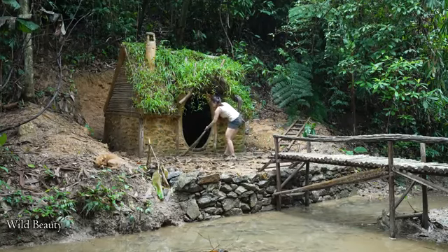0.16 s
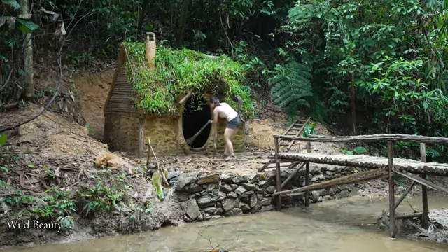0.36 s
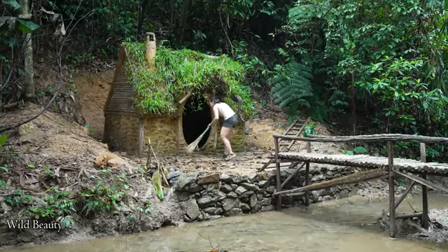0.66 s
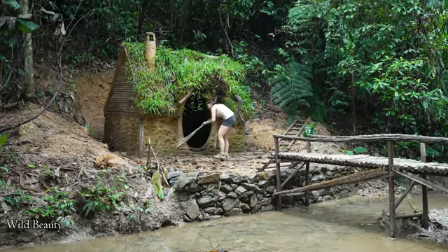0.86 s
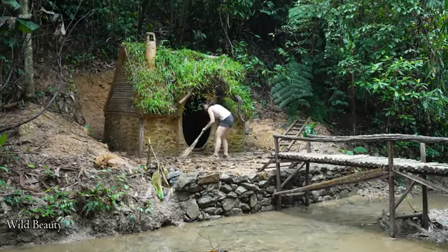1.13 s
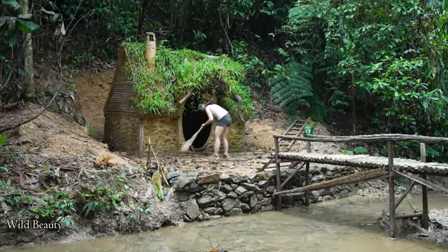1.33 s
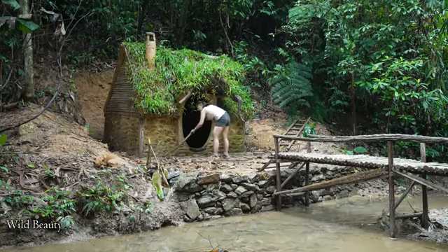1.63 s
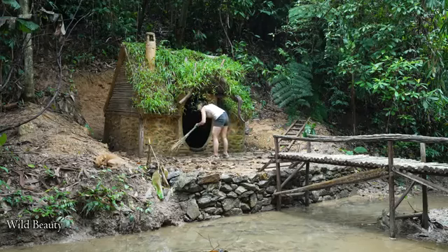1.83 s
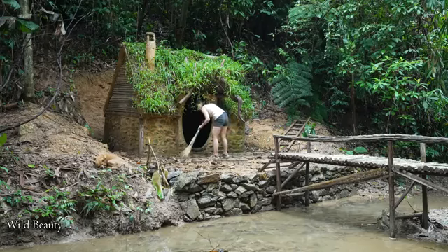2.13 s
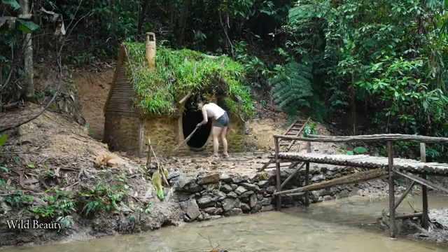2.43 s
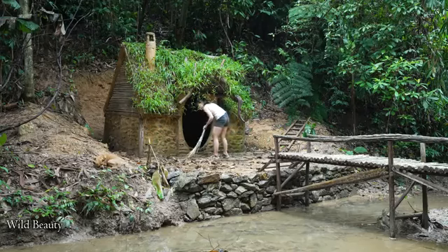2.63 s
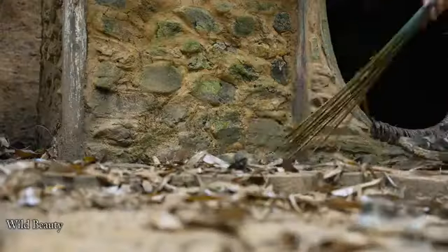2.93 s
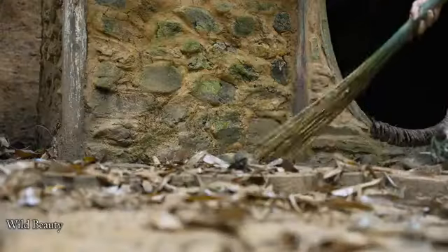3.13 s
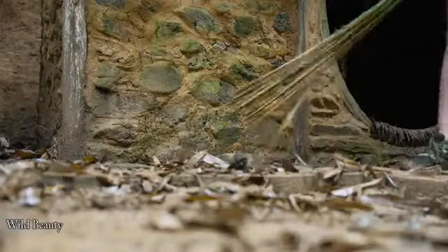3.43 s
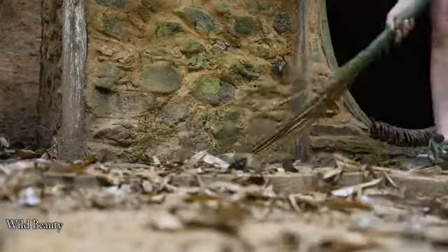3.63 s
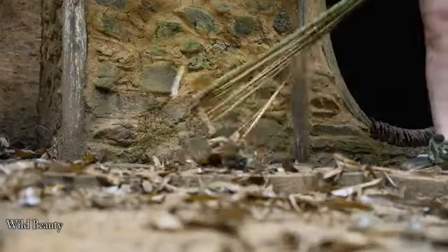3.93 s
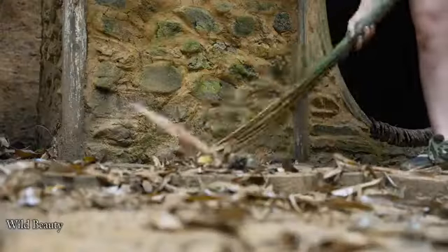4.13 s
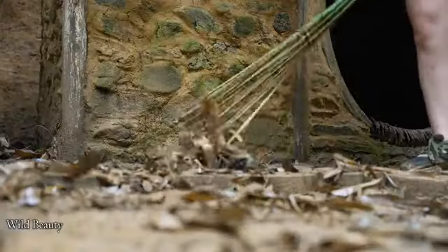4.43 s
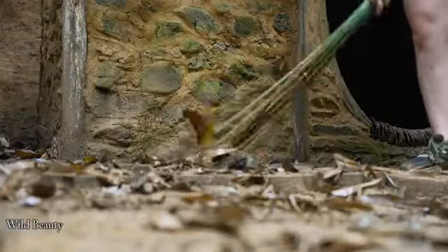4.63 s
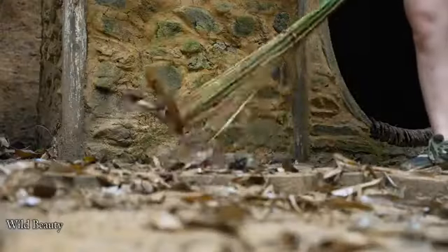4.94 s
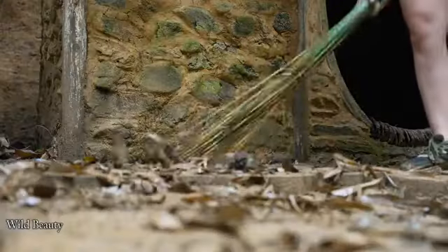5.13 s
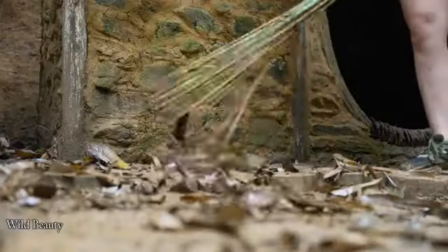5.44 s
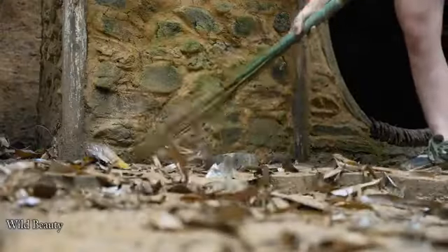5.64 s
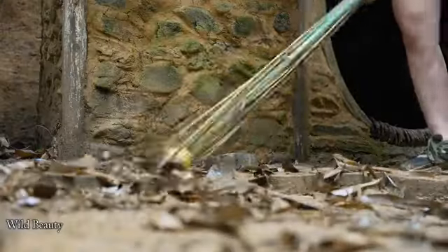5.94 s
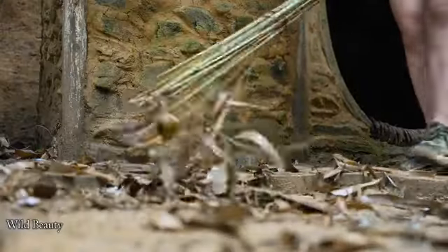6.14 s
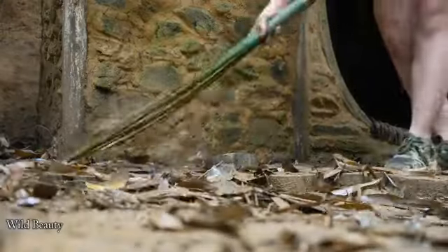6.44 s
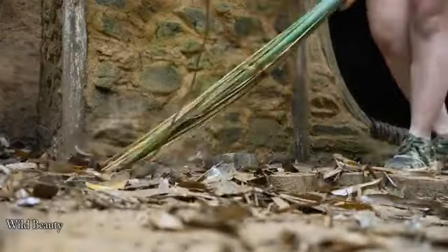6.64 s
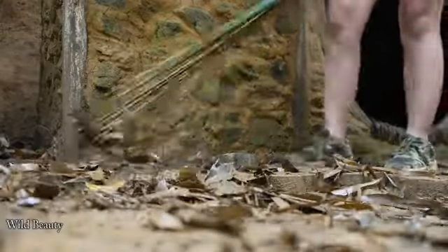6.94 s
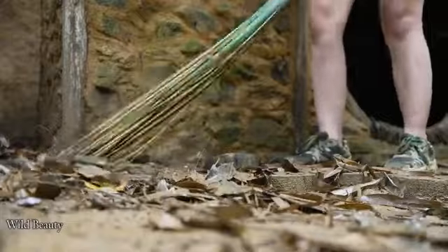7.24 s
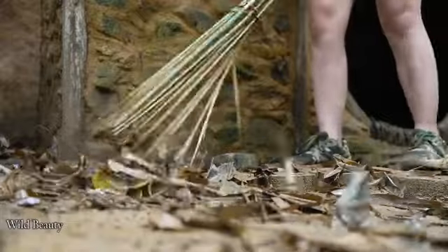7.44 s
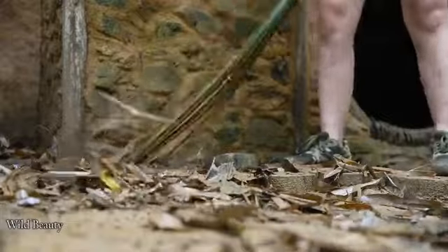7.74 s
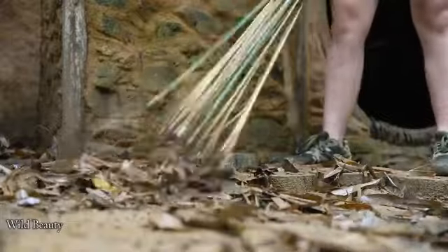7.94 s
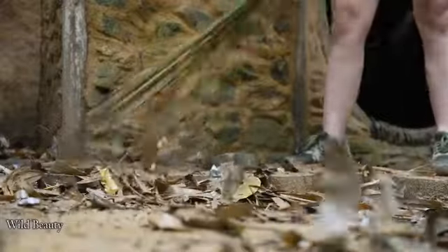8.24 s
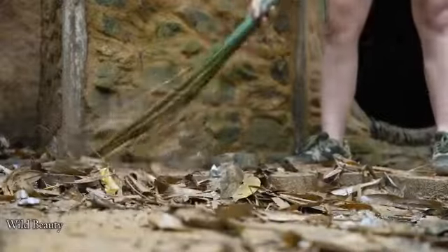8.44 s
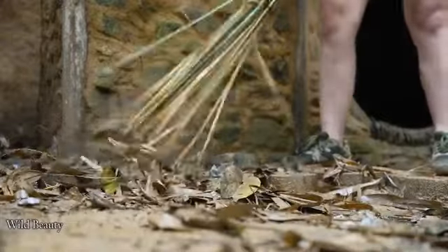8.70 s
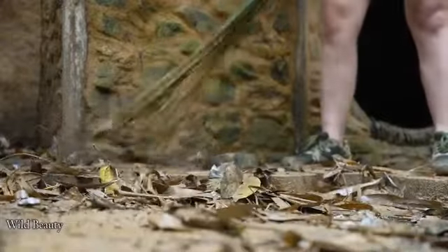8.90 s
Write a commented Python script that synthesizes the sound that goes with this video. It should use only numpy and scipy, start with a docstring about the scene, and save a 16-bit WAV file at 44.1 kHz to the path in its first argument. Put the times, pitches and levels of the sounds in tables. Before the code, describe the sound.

A bamboo broom sweeps dry leaves on packed earth in a forest, about two strokes a second. For three seconds it is farther from the microphone, with a high cricket chirping regularly, a fainter one buzzing, and thin insect hiss. Then the microphone is close: fuller rustling strokes, sharp crackles, hollow handle knocks and low earth thumps, with insects much fainter.

```python
"""First comes the hiss of far insects over a low forest murmur, with a short scuff of broom tines.
A split-bamboo broom then sweeps dry leaves over packed earth, far from the microphone and, after 3 s, close to it.
Noise gated by clumps of crackles makes the leaves; resonances make the hollow handle and the earth.
In the distant part a cricket chirps in tone pulses, and a fainter one answers in buzzes of narrow noise."""
import sys
import numpy as np
from scipy import signal
from scipy.fft import next_fast_len
from scipy.io import wavfile
from scipy.ndimage import uniform_filter1d

SR = 44100
rng = np.random.default_rng(int(sys.argv[2]) if len(sys.argv) > 2 else 0)


def generate_wav(sig):
    """Save sig (samples, or channels by samples) to the path in sys.argv[1] as 16-bit PCM at SR."""
    pcm = np.round(np.clip(np.atleast_2d(sig).T, -1, 1) * 32767).astype(np.int16)
    wavfile.write(sys.argv[1], SR, pcm)


N = 399987
CLOSE_S = 3.01  # from here on the microphone stands close to the broom


def gain_of(db):
    """Amplitude factor of a level in dB."""
    return 10 ** (np.asarray(db) / 20)


def evened(x):
    """Scales a signal to rms 1."""
    return x / np.sqrt(np.mean(x ** 2) + 1e-20)


def smoothed_twice(x, span):
    """Two moving averages over span samples leave a slow drift."""
    return uniform_filter1d(uniform_filter1d(x, span, axis=0), span, axis=0)


def coloured(x, points):
    """Causal filter whose gain follows a (Hz, dB) spectrum; white noise keeps its power."""
    hz = abs(np.fft.fftfreq(8192, 1 / SR))
    f, db = np.transpose(points)
    log_gain = np.interp(np.log(hz + 1), np.log(f), db) * np.log(10) / 20
    # minimum phase: the phase is the Hilbert transform of the log gain
    taps = np.fft.ifft(np.exp(np.conj(signal.hilbert(log_gain)))).real
    if abs(taps[:64]).sum() <= abs(taps[-64:]).sum():
        taps = np.roll(taps[::-1], 1)  # turned so that the response starts at once
    return signal.oaconvolve(x, taps[:2048] / np.linalg.norm(taps))[:N]


def resonate(x, hz, width):
    """One fixed resonance of gain 1."""
    r = np.exp(-np.pi * width / SR)
    return 2 * signal.lfilter([1 - r], [1, -r * np.exp(2j * np.pi * hz / SR)], x).real


def dying(power, decay_s):
    """Lets each burst of power die away exponentially."""
    return signal.lfilter([1], [1, -np.exp(-1 / (decay_s * SR))], power)


def bursts(per_s, spread_db, decay_s):
    """Power of leaves snapping at random moments, most small and a few large; mean 1."""
    chance = rng.random(N)
    size = np.minimum(rng.exponential(1, N), 3)
    power = dying((chance < per_s / SR) * gain_of(2 * spread_db * size), decay_s) / per_s
    return power / power.mean()


def event_power(events, db, decay_s):
    """Power of single events, each rising quickly and dying away."""
    power = np.zeros(N)
    power[np.round(np.transpose(events)[0] * SR).astype(int)] = gain_of(2 * db)
    return 2 * (dying(power, decay_s) - dying(power, .3 * decay_s))


# low forest air, spectrum: (f/Hz, relative level per Hz/dB)
LOW_AIR = [(20, -25), (60, -18.5), (200, -9), (600, -9), (2000, -38.5)]
# treble of forest air and crisp leaves, spectrum: (f/Hz, relative level per Hz/dB)
TREBLE = [(3500, -19.5), (5200, -2.5), (8000, -3.5), (11000, -9.5), (15000, -10.5)]
LOW_AIR_DB, HISS_DB = -48.5, -52


def breeze():
    """Steady low murmur and faint treble hiss of the forest, both coloured noise."""
    low, high = rng.standard_normal((N, 2)).T
    return gain_of(LOW_AIR_DB) * coloured(low, LOW_AIR) + gain_of(HISS_DB) * coloured(high, TREBLE)


# hiss bands of distant insects: (f/Hz, width/Hz, level before the wavering/dB)
INSECT_BANDS = [(4190, 830, -40), (4900, 840, -52.5), (6540, 590, -44)]
INSECTS_CLOSE_DB = -12  # change of their level once the microphone is close to the broom


def chorus():
    """Narrow wavering hiss of many far insects, fainter close to the broom."""
    noise, waver = rng.standard_normal((N, 2)).T
    waver = evened(smoothed_twice(waver, 3000))
    bands = sum(gain_of(db) * evened(resonate(resonate(noise, hz, width), hz, width))
                for hz, width, db in INSECT_BANDS)
    close = np.arange(N) > CLOSE_S * SR
    return bands * gain_of(0.79 * waver + INSECTS_CLOSE_DB * close)


LAND_S = 0.014  # time the tines take to land


def contact(start, land_db, push_s, top_db, fade_db_per_s):
    """Power of one touch of the broom: quick landing, swell, then a steady fade in dB."""
    u = np.arange(N) / SR - start
    swell_db = (top_db - land_db) * np.clip(u / push_s, 0, 1)
    db = land_db + swell_db - fade_db_per_s * np.maximum(u - push_s, 0)
    return np.clip(u / LAND_S, 0, 1) ** 2 * gain_of(2 * db)


# strokes: the tines land, the drag swells through the push, then dies as the broom lifts and the leaves settle
# (landing t/s, landing drag level/dB, push t/s, drag level at end of push/dB, fade/dB per s,
#  base treble level over drag/dB)
SWEEPS = [(0.117, -22, 0.04, -19.5, 31, -12), (0.625, -13.5, 0.07, -15, 98, -7.5),
          (1.112, -19.5, 0.2, -13, 148, -7.5), (1.645, -18, 0.057, -16, 203, -9.5),
          (2.07, -26, 0.13, -14, 144, -11.5), (2.595, -16, 0.18, -12.5, 95, -6.5),
          (3.095, -15.5, 0.28, -15, 122, -9.5), (3.635, -14, 0.27, -15.5, 134, -10),
          (4.148, -15, 0.22, -13.5, 83, -7), (4.645, -17, 0.18, -11.5, 95.5, -11),
          (5.115, -14.5, .2, -13, 88, -6.5), (5.695, -26, 0.19, -12, 48, -8),
          (6.508, -11, 0.22, -12.5, 71, -11.5), (7.095, -25, 0.18, -8, 52.5, -9),
          (7.76, -13.5, 0.17, -11.5, 59, -11.5), (8.435, -16, 0.22, -9, 85, -7),
          (9.04, -9.5, 0.041, -19, 96, -13)]
# short scuffs as tines catch again within or between strokes: (start t/s, length t/s, drag level/dB)
CATCHES = [(0, 0.023, -27), (0.453, 0.087, -24.5), (0.764, 0.083, -18.5), (1.75, 0.2, -17),
           (2.258, 0.12, -18), (2.828, 0.14, -15.5), (3.027, 0.0098, -17), (3.441, 0.018, -16.5),
           (3.511, 0.095, -22.5), (4.483, 0.045, -25), (5.014, .03, -34), (5.746, 0.34, -16),
           (6.394, 0.02, -20.5), (6.443, 0.031, -17.5), (6.86, 0.06, -24), (7.121, 0.029, -14.5),
           (7.556, 0.016, -21), (7.986, 0.11, -21.5), (8.831, 0.089, -17.5), (8.951, 0.017, -21)]
SCUFF_FADE_DB_PER_S, REST_DB = 323, -35.5  # end of a scuff; leaves stirring between strokes


def drag():
    """Drag on the leaves in dB, summed as power over all strokes and scuffs."""
    power = sum(contact(*row[:-1]) for row in SWEEPS)
    power = power + sum(contact(s, db, length, db, SCUFF_FADE_DB_PER_S) for s, length, db in CATCHES)
    return 10 * np.log10(power + gain_of(2 * REST_DB))


# spectrum of rustling leaves: (f/Hz, relative level per Hz/dB)
RUSTLE_COLOUR = [(40, -59.5), (120, -15.5), (300, -5.5), (850, -6.5), (1450, -2), (2300, -0.5), (3700, 0.5),
                 (5000, -11.5), (6500, -44.5)]
# overtones of handle and tines: (f/Hz, width/Hz, level/dB relative to the rustle)
RINGS = [(1097, 70.4, 10.5), (1784, 86, -2), (2196, 71, -0.5), (3320, 440, -11.5)]
# loudest single crackles: (t/s, relative peak level/dB, relative treble level/dB)
LOUD_CRACKLES = [(0.1275, -17, -39), (.2495, -11.5, -29), (.302, -14, -30.5), (0.637, -5.5, -22),
                 (.684, -6.5, -21), (0.773, -6.5, -21), (0.841, -9.5, -41), (1.028, -20, -43),
                 (1.1233, -12.5, -42), (1.1805, -2.5, -25), (1.288, -7, -30), (1.322, -4, -29),
                 (1.516, -8.5, -37), (2.171, -2.5, -31), (2.183, -7, -23), (2.278, -5, -27),
                 (2.3575, -4.5, -41), (2.605, -6, -41), (2.671, -6, -28), (2.834, -1, -22), (3.11, -5, -38),
                 (3.1362, -2, -29), (3.235, -1, -27), (3.3295, -1.5, -17.5), (3.4503, -4.5, -30.5),
                 (3.497, -7.5, -36), (3.5272, -4, -41), (3.648, 0, -28), (3.704, -3, -19), (3.724, -4, -23),
                 (3.7673, -2, -19), (3.8652, -5, -23), (3.994, -14, -34), (4.1586, -2, -22),
                 (4.339, -2, -23), (4.4195, -5, -32), (4.487, -9, -37), (4.653, -4, -33),
                 (4.706, -3.5, -32), (4.836, -3, -18.5), (5.035, -14.5, -48), (5.129, -3, -24),
                 (5.207, -5, -28), (5.3844, -7, -37), (5.7568, -3, -30), (6.0108, -10, -28),
                 (6.357, -11.5, -55), (6.5165, 0, -46), (6.8265, 0, -32), (6.921, -9, -22),
                 (6.96, -10.5, -47), (7.1383, -0.5, -27), (7.216, 2, -25.5), (7.281, 1.5, -28),
                 (7.331, -11, -31), (7.436, 0.5, -20.5), (7.4734, -0.5, -26.5), (7.5669, -5.5, -40),
                 (7.767, -3, -45), (7.8303, -13, -36), (7.851, -6, -32), (8.035, -2, -26),
                 (8.0675, -7, -38), (8.086, -5.5, -38), (8.2789, -9.5, -30.5), (8.4472, -2, -23.5),
                 (8.4991, -5, -43), (8.7586, -9, -30), (8.8137, -4, -39), (8.874, -1.5, -21.5)]
RING_PATCHY_DB = 4  # rms


def rustle(drag_db, clumps, ticks, scratches, grip):
    """Leaves crushed in clumps: gated noise that also excites the overtones of handle and tines."""
    _, peak_db, _ = np.transpose(LOUD_CRACKLES)
    power = gain_of(2 * drag_db) * (0.16 + .3 * clumps + 0.045 * ticks + 0.16 * scratches)
    power = power + event_power(LOUD_CRACKLES, peak_db - 8.5, decay_s=0.0046)
    leaves = coloured(rng.standard_normal(N) * np.sqrt(power), RUSTLE_COLOUR)
    rung = leaves
    # the overtones ring unevenly as the grip and the tines shift
    for (hz, width, db), shift in zip(RINGS, grip.T):
        uneven = leaves * gain_of(RING_PATCHY_DB * evened(shift))
        rung = rung + gain_of(db) * resonate(uneven, hz, width)
    close = np.arange(N) / SR > CLOSE_S
    return rung + close * gain_of(-5) * resonate(rung, 694, 350)  # more body close by


def tines(per_s, spread_db, cycles, count):
    """Small pitched snaps: each flick rings one tine or twig for tens of cycles; rms 1."""
    size = gain_of(spread_db * np.minimum(rng.exponential(1, N), 4)) * (rng.random(N) < per_s / SR)
    which = rng.integers(0, count, N)
    pitches = np.geomspace(1750, 4200, count)
    return evened(sum(resonate(size * (which == k), hz, hz / cycles) * cycles / hz
                      for k, hz in enumerate(pitches)))


def crisp_treble(drag_db, clumps, ticks, sparks):
    """Crisp leaf treble: noise gated more spikily than the rustle, so that short ticks stand out."""
    t = np.arange(N) / SR
    base_db = np.interp(t, *np.transpose(SWEEPS)[[0, -1]])
    crisp_db = base_db - 0.098 * (drag_db + 48.0)  # light strokes are crisper
    _, _, treble_db = np.transpose(LOUD_CRACKLES)
    power = gain_of(2 * (drag_db + crisp_db)) * (0.14 + 0.17 * clumps + 0.14 * ticks + 0.016 * sparks)
    power = power + event_power(LOUD_CRACKLES, treble_db + 1.5, decay_s=0.0032)
    # the dry crack that starts each one
    power = power + event_power(LOUD_CRACKLES, treble_db + 13, decay_s=0.0002)
    return coloured(rng.standard_normal(N) * np.sqrt(power), TREBLE)


# jolts of the handle as the broom lands or knocks during a stroke, heard close by: (t/s, peak level/dB)
HANDLE_JOLTS = [(3.035, -17), (3.083, -8.5), (3.14, -8.5), (3.209, -11), (3.648, -11.5), (4.157, -8.5),
                (4.244, -11.5), (4.653, -10.5), (5.129, -12.5), (5.796, -7.5), (6.456, -10.5),
                (6.588, -15), (7.13, -10.5), (7.696, -25), (7.767, -4), (8.436, -14.5), (8.481, -12.5),
                (9.047, -10)]
HANDLE_HZ, HANDLE_WIDTH_HZ = 356, 70  # lowest air mode of the hollow handle
HANDLE_WAVER_HZ = 12  # rms


def jolts():
    """Each jolt swells for a few cycles and dies, its pitch a little different with every grip."""
    out, t = np.zeros(N), np.arange(6000) / SR
    u = t / 0.011  # time in units of the swell
    for (s, db), (pitch, phase) in zip(HANDLE_JOLTS, rng.uniform(-1.15, 1, (len(HANDLE_JOLTS), 2))):
        hz = HANDLE_HZ * (1 + .04 * pitch)
        ring = gain_of(db) * u * np.exp(1 - u) * np.sin(2 * np.pi * hz * t + np.pi * phase)
        part = out[round(s * SR):][:len(t)]
        part += ring[:len(part)]
    return out


def handle_hum(drag_db, shake, grip_drift):
    """The hollow handle resonates with the drag, faintly from afar, and rings on after each jolt."""
    noise = rng.standard_normal(N) * shake
    hum = resonate(resonate(noise, HANDLE_HZ, HANDLE_WIDTH_HZ), HANDLE_HZ, 88)
    # the grip bends the pitch
    waver = np.exp(2j * np.pi * np.cumsum(HANDLE_WAVER_HZ * evened(grip_drift)) / SR)
    return (signal.hilbert(hum, next_fast_len(N))[:N] * waver).real + jolts()


def ground(shake):
    """The earth drums under the tines as a low resonance, and each jolt of the handle thumps."""
    thumps = event_power(HANDLE_JOLTS, np.transpose(HANDLE_JOLTS)[1] + 25.6, decay_s=0.012)
    noise = rng.standard_normal(N) * np.sqrt(shake ** 2 + thumps)
    return gain_of(-23.0) * resonate(noise, 183, 68)


def snaps(db, decay_s, width_hz):
    """The pitched core of each loud crackle: a burst of noise in a broad resonance."""
    out, fade = np.zeros(N), np.exp(-np.arange(2000) / (decay_s * SR))
    noise = rng.standard_normal((len(LOUD_CRACKLES), len(fade)))
    pitches = 1000 * 3.7 ** rng.random(len(LOUD_CRACKLES))
    for (s, peak_db, _), hz, burst in zip(LOUD_CRACKLES, pitches, noise):
        part = out[round(s * SR):][:len(fade)]
        part += (gain_of(peak_db + db) * resonate(burst * fade, hz, width_hz))[:len(part)]
    return out


def broom():
    """The same drag and crackles drive rustle, tines, crisp treble, handle and earth."""
    drag_db = drag()
    busy = gain_of(.6 * (drag_db + 19.0))  # a heavy stroke crushes more leaves a second
    clumps = bursts(per_s=110 * busy, spread_db=3.8, decay_s=0.0065)
    ticks = bursts(per_s=60 * busy, spread_db=5.5, decay_s=0.004)
    sparks = bursts(per_s=40, spread_db=5.5, decay_s=.0004)
    scratches = bursts(per_s=150 * busy, spread_db=4.5, decay_s=.0012)  # single twig tips catching
    grip = smoothed_twice(rng.standard_normal((N, len(RINGS))), round(0.038 * SR))
    leaves = gain_of(-5.5) * rustle(drag_db, clumps, ticks, scratches, grip)
    flick_gain = gain_of(drag_db - 7.0) * np.sqrt(0.084 + 0.67 * ticks)
    flicks = flick_gain * tines(per_s=1200, spread_db=3.0, cycles=70.0, count=16)
    crisp = crisp_treble(drag_db, clumps, ticks, sparks)
    far = np.arange(N) / SR < CLOSE_S
    steady_db = np.where(far, drag_db - 31.0, 0.78 * drag_db - 14.5)
    shake = gain_of(steady_db + 27.0) * np.sqrt(.5 + .5 * clumps)
    hum = handle_hum(drag_db, shake, grip[:, -1])
    return leaves + flicks + crisp + hum + ground(shake) + snaps(db=6.0, decay_s=0.005, width_hz=230)


# cricket chirps heard from the distant place: middle of the last pulse, t/s
CHIRP_ENDS = [.194, .451, .725, .997, 1.259, 1.533, 1.79, 2.053, 2.318, 2.578, 2.845]
CRICKET_HZ, CRICKET_DB = 7755, -30.5  # mean pitch and peak level of the full-strength pulses
PULSE_S = .0148  # spacing of the pulses


def cricket():
    """Each chirp is a row of nine tone pulses that swell and climb slightly in pitch."""
    out, half = np.zeros(N), round(0.0079 * SR)
    t, shape = np.arange(2 * half) / SR, np.hanning(2 * half)
    for end in CHIRP_ENDS:
        for k in range(9):  # counted back from the last pulse
            early = max(k - 4, 0)  # the last five pulses are at full strength
            at = round((end - k * PULSE_S) * SR) - half
            hz = CRICKET_HZ - 30 * early + 35 * rng.standard_normal()
            db = CRICKET_DB - 1.8 * early + 1.3 * rng.standard_normal()
            tone = np.sin(2 * np.pi * (hz * t + rng.random()))
            out[at:at + 2 * half] += gain_of(db) * shape * tone
    return out


# dull thuds of foot or broom on the earth: (t/s, relative level/dB)
THUDS = [(0.126, -10.5), (7.05, -6.5), (7.695, -15)]


def steps():
    """Each thud is a dull puff of noise through two broad low resonances."""
    power = event_power(THUDS, np.transpose(THUDS)[1], decay_s=0.013)
    return resonate(resonate(rng.standard_normal(N) * np.sqrt(power), 440, 550), 450, 730)


# a second, farther cricket: middle of each buzz, t/s
BUZZES = [.44, 1.1, 1.62, 2.12]
ANSWER_HZ, ANSWER_DB = 8300, -51


def answers():
    """Short fuzzy buzzes of narrow noise, blurred by distance."""
    t = np.arange(N) / SR
    shape = sum(np.exp(-((t - s) / .035) ** 2) for s in BUZZES)
    buzz = resonate(resonate(rng.standard_normal(N), ANSWER_HZ, 300), ANSWER_HZ, 300)
    return gain_of(ANSWER_DB) * shape * evened(buzz)


def scene():
    """All sources summed at one microphone."""
    return (breeze() + chorus() + broom() + cricket() + steps() + answers())[None]


def record(dry):
    """Gain control evens out the heavy strokes; soft limit, bass roll-off and band limit follow."""
    power_db = 10 * np.log10(abs(uniform_filter1d(dry[0] ** 2, size=300)) + 1e-12)
    fall = np.arange(N) * 38.0 / SR  # the held peak level sinks this many dB a second
    held_db = np.maximum.accumulate(power_db + fall) - fall
    over_db = np.maximum(held_db + 10.0, 0)
    ducked = dry / gain_of(0.5 * uniform_filter1d(over_db, size=100))  # half of the excess is taken off
    soft = 0.83 * np.tanh(ducked / 0.86)
    limited = signal.lfilter(*signal.butter(1, 80, "high", fs=SR), soft)
    band_limit = signal.firwin(511, 15050, window=("kaiser", 9), fs=SR)
    return signal.oaconvolve(limited, band_limit[None], "same")


dry = scene()
out = record(dry)
generate_wav(out)
```